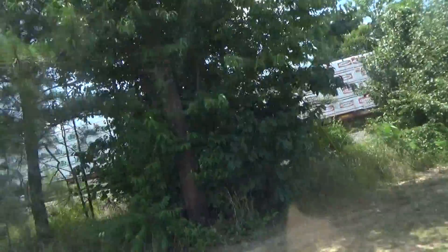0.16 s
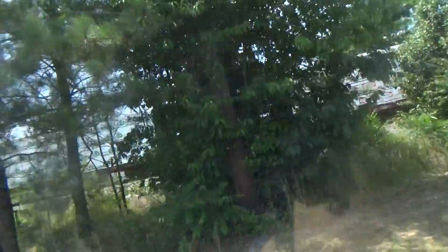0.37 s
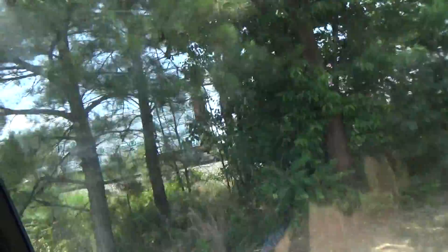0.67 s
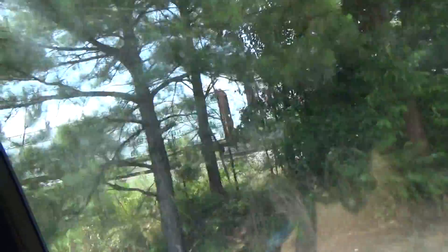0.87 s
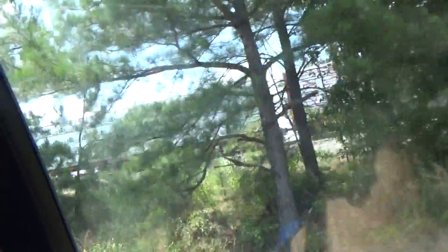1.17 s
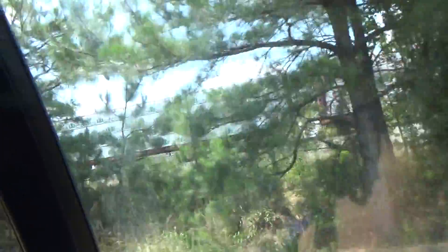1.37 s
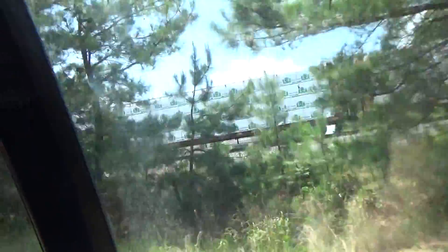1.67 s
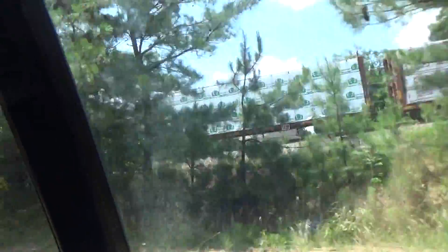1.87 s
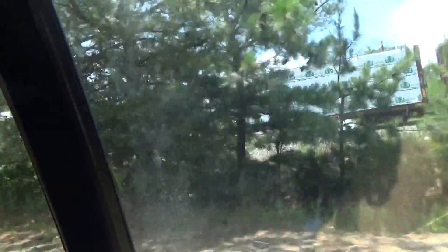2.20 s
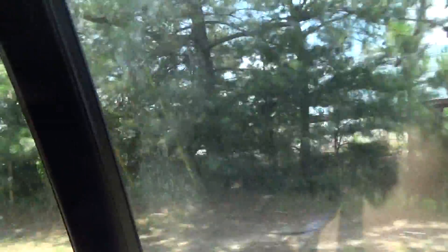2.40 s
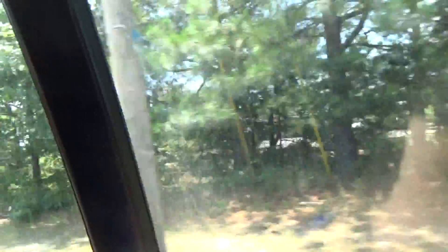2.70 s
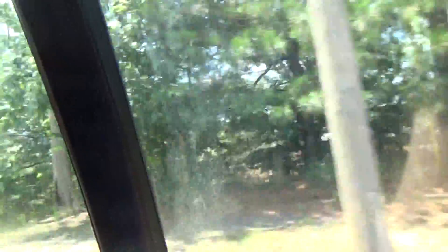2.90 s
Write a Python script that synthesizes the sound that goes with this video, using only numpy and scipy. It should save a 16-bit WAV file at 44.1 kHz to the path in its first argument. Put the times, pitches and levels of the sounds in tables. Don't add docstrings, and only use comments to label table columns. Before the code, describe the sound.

Inside a moving car, a low booming engine accelerates steadily through one gear; gravel hisses under the tyres at first, grass brushes the side and trim buzzes midway, then the road turns smoother. Close stereo microphone.

```python
import sys
import numpy as np
from scipy import signal
from scipy.fft import rfft, irfft, next_fast_len
from scipy.io import wavfile
from scipy.ndimage import uniform_filter1d, minimum_filter1d, map_coordinates

SR = 44100
rng = np.random.default_rng(int(sys.argv[2]) if len(sys.argv) > 2 else 0)


def voltage_ratio(level):
    return 10 ** (np.asarray(level, float) / 20)


def master_out(mix):
    frames = np.transpose(np.atleast_2d(mix))
    ceiling = np.clip(frames, -1, 1)
    pcm = np.round(ceiling * 32767).astype(np.int16)
    wavfile.write(sys.argv[1], SR, pcm)


N = 134505
T_S = np.arange(N) / SR
LEFT_RIGHT = np.array([[.5], [-.5]])

# (time [s], stone hiss [dB], tyre roar [dB])
ROAD_LEVELS = [(0.04, -48, -38.5), (0.05, -48, -38.5), (0.34, -40, -29), (0.41, -38.5, -29.5),
               (0.6, -39.5, -30.5), (1.03, -44, -29.5), (1.23, -42.5, -31), (1.34, -43, -31.5),
               (1.35, -41, -32), (1.8, -55.5, -41.5), (2.31, -56.5, -38), (2.52, -56.5, -42),
               (2.77, -59.5, -41), (2.95, -59.5, -41.5), (3.0, -63.5, -43)]
# (frequency [Hz], density [dB/Hz])
HISS_SPECTRUM = [(1470, -30), (2500, -3), (5010, -1.5), (5920, -2), (6640, -4), (10600, -4), (14200, -8),
                 (15500, -15)]
ROAR_SPECTRUM = [(180, -18), (300, -4.5), (404, -5), (439, -1), (929, -6.5), (1720, -15), (2250, -18),
                 (3500, -39.5), (4550, -43.5), (7700, -120)]
RUMBLE_SPECTRUM = [(15, 2), (32, 0), (60, 1), (200, 2.5), (500, -7.5), (1200, -39), (2500, -32.5),
                   (7000, -47)]
BRUSH_SPECTRUM = [(4000, -18), (6000, -5), (8000, -0.5), (12500, -2.5), (15000, -7)]
# (centre [Hz], width [Hz], gain [dB])
CABIN_PEAKS = [(900, 140, 4), (1530, 170, 4), (2230, 250, 4), (3030, 200, 2.5), (5920, 180, 5),
               (670, 80, -4), (1740, 160, -6), (6800, 600, -6)]
# (frequency [Hz], correlation [-])
LIKENESS = [(60, 0.44), (250, 0.82), (640, 0.87), (1400, 0.74), (3100, 0.74), (6800, 0.87), (15000, 0.94)]
# (frequency [Hz], left over right [dB])
NOISE_LEAN = [(60, -3.5), (500, 4), (1000, 2.3), (2000, 2), (4000, 3), (12000, -0.5)]
# (start [s], length [s], pitch [Hz], level [dB])
BUZZES = [(-.15, .4, 3070, -52), (1.04, .2, 1460, -39), (1.225, .1, 1460, -32), (1.12, .28, 1580, -37),
          (1.34, .24, 1590, -39), (1.34, .12, 1460, -38), (1.29, .13, 9100, -48), (1.29, .12, 12200, -50),
          (1.12, .16, 12200, -52), (1.3, .12, 8000, -50), (1.25, .16, 10700, -51), (1.38, .1, 9600, -51),
          (2.929, .018, 5680, -52), (2.944, .011, 5600, -56), (1.35, .16, 3390, -47),
          (1.64, .08, 2100, -47), (-.1, .95, 5950, -48), (.22, .13, 1500, -44), (.18, .09, 780, -38),
          (.88, .24, 527, -31), (2.76, .26, 438, -35)]
# (centre time [s], level [dB], centre [Hz], length [s])
TICKS = [
    (1.75, -53, 4000, .024),
    (1.997, -49, 4500, .022),
    (2.15, -55, 5000, .02),
    (2.37, -55, 9500, .11),
    (2.565, -51, 4200, .016),
    (2.65, -53, 11500, .045),
    (2.717, -51, 4500, .014),
    (2.72, -56, 12000, .02),
    (1.28, -42, 11000, .045),
    (1.395, -41, 1100, .02),
]
# (time [s], pitch [Hz])
TREAD_PITCH = [(0, 141), (.25, 146), (.5, 154), (.75, 166), (.95, 177), (1.14, 185), (1.52, 199.5),
               (1.71, 207), (1.9, 215), (2.09, 224), (2.28, 228.5), (2.56, 226)]
# (time [s], first [dB], second [dB], third [dB])
TREAD_PARTIALS = [(0, -52, -23.5, -54), (.25, -54, -25.5, -61), (.45, -42, -36.5, -44),
                  (.7, -33, -36, -37.5), (.95, -25, -28, -58), (1.2, -24.5, -33, -54),
                  (1.5, -31.5, -23, -58), (1.75, -27.5, -32.5, -72), (1.95, -36, -54, -49),
                  (2.1, -24, -57.5, -52), (2.4, -24, -55, -54.5), (2.56, -34.5, -53, -64)]
# (frequency [Hz], gain [dB])
CABIN_RESPONSE = [(30, -2.5), (62, -15), (69, -7.5), (76, -3.5), (84, -1.5), (106, -0.5), (125, -8), (137, -1),
                  (146, -7), (159, -25.5), (167, -16), (192, -11.5), (211, -9), (240, -7.5), (250, -13.5),
         (263, -8.5),
                  (283, -18), (294, -20), (306, -24), (319, -20), (335, -20), (360, -20), (395, -24),
                  (425, -19), (448, -19), (465, -13), (490, -15), (525, -13), (543, -16), (560, -31)]
# (frequency [Hz], left over right [dB])
ENGINE_LEAN = [(70, 1.5), (140, 1.6), (155, 3.5), (185, 0.5), (225, -2.5), (270, -0.5), (320, 2), (500, -2)]
# (time [s], firing rate [Hz])
FIRING_RATE = [(0, 62.6), (.1, 63.9), (.4, 68.6), (.55, 70.8), (1, 75.4), (1.15, 77.5), (1.45, 82.8),
               (1.9, 91.3), (2.2, 97.5), (2.5, 102.9), (3.05, 112.7)]
# (multiple of firing rate [-], level [dB])
FIRING_ORDERS = [(1, -10), (2, -10), (3, -13), (4, -20), (5, -21.5), (6, -22), (7, -25.5), (8, -25),
                 (9, -41)]
# (multiple of firing rate [-], level [dB])
UNEVEN_ORDERS = [(.5, -48), (.75, -31.5), (1.25, -36.5), (1.5, -41.5), (1.75, -39.5), (2.5, -40),
                 (2.75, -38), (3.5, -34), (3.75, -32)]
PATH_PHASE = {2: (2.2, -.3), 3: (2.4, 4.7), 4: (2.4, 2.1)}
# (multiple [-], start [s], length [s], level [dB])
DRIVELINE = (2.75, 1.08, .8, -26)
# (frequency [Hz], left lead [rad])
LEFT_LEAD = [(40, 0.33), (110, 0.65), (200, 0.77), (430, 1.28), (780, 0.48), (1120, 0.2), (1900, .01),
             (15000, .01)]


def unit(x):
    return x / np.sqrt(np.mean(x ** 2) + 1e-20)


def along(points, hz):
    f, v = np.transpose(points)
    return np.interp(np.log(hz + 1), np.log(f + 1), v)


def curves(rows):
    s, *cols = np.transpose(rows)
    return [np.interp(T_S, s, c) for c in cols]


def wobble(rate_hz):
    knots = rng.standard_normal(int(N * rate_hz / SR) + 4)
    return map_coordinates(knots, [np.arange(N) * rate_hz / SR])


def swell(start_s, length_s):
    return np.sin(np.pi * np.clip((T_S - start_s) / length_s, 0, 1)) ** 2


def filtered(x, response):
    m = next_fast_len(N + SR // 2)
    return irfft(rfft(x, m) * response(np.fft.rfftfreq(m, 1 / SR)), m)[..., :N]


def resonance(hz, centre_hz, width_hz):
    return 1 / (1 + (2 * (hz - centre_hz) / width_hz) ** 2)


def coloured(spectrum):
    shut = [(spectrum[0][0] / 2, -60)] + list(spectrum) + [(spectrum[-1][0] * 2, -90)]

    def gain(hz):
        peaks_db = sum(db * resonance(hz, c, w) for c, w, db in CABIN_PEAKS)
        return voltage_ratio(along(shut, hz) + peaks_db)
    return gain


def random_field(shape, bins, frames):
    rough = uniform_filter1d(rng.standard_normal(shape), bins, axis=0)
    return unit(uniform_filter1d(rough, frames, axis=1))


def rush(gain, patchy_db, streaky_db=0):
    z = signal.stft(rng.standard_normal((2, N)), nperseg=512)[2]
    patches_db = patchy_db * random_field(z.shape[1:], 5, 10)
    streaks_db = streaky_db * random_field(z.shape[1:], 2, 20)
    pair = signal.istft(z * voltage_ratio(patches_db + streaks_db), nperseg=512)[1][:, :N]

    def mid_side(hz):
        angle = np.arccos(np.clip(along(LIKENESS, hz), -1, 1)) / 2
        return gain(hz) * np.array([np.cos(angle), np.sin(angle)])

    mid, side = filtered(pair, mid_side)
    stereo = np.array([mid + side, mid - side])
    return unit(filtered(stereo, lambda hz: voltage_ratio(along(NOISE_LEAN, hz) * LEFT_RIGHT)))


def road():
    hiss_db, roar_db = curves(ROAD_LEVELS)
    shared_db = .55 * wobble(13)
    hiss_db = hiss_db + 3 + shared_db + .78 * wobble(40.8)
    roar_db = roar_db + 2.5 + shared_db
    rumble_db = -28 + .37 * wobble(2.8)
    hiss = voltage_ratio(hiss_db) * rush(coloured(HISS_SPECTRUM), patchy_db=0, streaky_db=1.5)
    roar = voltage_ratio(roar_db) * rush(coloured(ROAR_SPECTRUM), patchy_db=1, streaky_db=.3)
    rumble = voltage_ratio(rumble_db) * rush(coloured(RUMBLE_SPECTRUM), patchy_db=1.84, streaky_db=2.3)
    return hiss + roar + rumble


def brush():
    level = voltage_ratio(-39.5 + wobble(34)) * swell(start_s=1.02, length_s=.6)
    return level * rush(coloured(BRUSH_SPECTRUM), patchy_db=1, streaky_db=6.5)


def buzz(hz):
    core_hz, width_share = 750, .045
    in_phase = core_hz / hz + wobble(width_share * hz)
    quadrature = wobble(width_share * hz)
    angle = 2 * np.pi * hz * T_S
    return unit(in_phase * np.sin(angle) + quadrature * np.cos(angle))


def trim():
    buzzes = sum(voltage_ratio(db) * swell(s, length) * buzz(hz) for s, length, hz, db in BUZZES)
    out = buzzes * voltage_ratio(1.6 * LEFT_RIGHT)
    air = rush(np.ones_like, patchy_db=0)
    for s, db, centre_hz, length in TICKS:
        tick = unit(filtered(air, lambda hz: resonance(hz, centre_hz, width_hz=centre_hz)))
        out = out + voltage_ratio(db) * swell(s - length / 2, length) * tick
    return out


def tread():
    fade_s, lean_db = .078, 3.5
    turn = 2 * np.pi * np.cumsum(curves(TREAD_PITCH)[0]) / SR
    hum = np.zeros(N)
    for k, db in enumerate(curves(TREAD_PARTIALS), start=1):
        hum += voltage_ratio(db + 1.5 * wobble(11)) * np.sin(k * turn + .3 * wobble(12))
    on = np.clip((TREAD_PITCH[-1][0] - T_S) / fade_s, 0, 1)
    return np.sqrt(2) * hum * on * voltage_ratio(lean_db * LEFT_RIGHT)


def cabin(hz):
    level_db = uniform_filter1d(along(CABIN_RESPONSE, hz), size=31)
    mirrored_db = np.r_[level_db, level_db[::-1]]
    lag = np.imag(signal.hilbert(mirrored_db))[:len(hz)] * np.log(10) / 20
    return voltage_ratio(level_db + along(ENGINE_LEAN, hz) * LEFT_RIGHT) * np.exp(-1j * lag)


def driveline(turn):
    k, start_s, length_s, db = DRIVELINE
    level = voltage_ratio(db + 1.7 * wobble(11.64)) * swell(start_s, length_s)
    return np.sqrt(2) * level * np.sin(k * turn + .34 * wobble(9.33))


def engine():
    crank_rad, handover_hz = .4, (72, 82)
    shake_db, shake_rad = .4, .045
    rate_hz, = curves(FIRING_RATE)
    turn = 2 * np.pi * np.cumsum(rate_hz) / SR + crank_rad
    steps_per_hz = 10
    gain = cabin(np.arange(12000) / steps_per_hz)
    out = np.zeros((2, N))
    for k, db in FIRING_ORDERS + UNEVEN_ORDERS:
        rough = min(k, 3) if k % 1 == 0 else 5
        level = voltage_ratio(db + shake_db * rough * wobble(7.5))
        path_rad = np.interp(rate_hz, handover_hz, PATH_PHASE.get(k, (0, 0)))
        phase = k * turn - np.pi / 2 + path_rad + shake_rad * rough * wobble(14)
        heard = gain[:, np.round(steps_per_hz * k * rate_hz).astype(int)]
        out += np.sqrt(2) * np.real(level * np.exp(1j * phase) * heard)
    return out + driveline(turn)


def scene():
    return road() + brush() + trim() + tread() + engine()


def top_cut(x):
    return signal.sosfilt(signal.butter(12, 15640, fs=SR, output="sos"), x)


def record(dry):
    ceiling_db, hold_s = -3.8, .03
    x = filtered(dry, lambda hz: np.exp(1j * along(LEFT_LEAD, hz) * LEFT_RIGHT))
    need = np.minimum(1, voltage_ratio(ceiling_db) / (np.abs(x).max(0) + 1e-9))
    hold = int(hold_s * SR)
    limit = uniform_filter1d(minimum_filter1d(need, hold), hold // 2)
    return top_cut(x * limit)


dry = scene()
out = record(dry)
master_out(out)
```